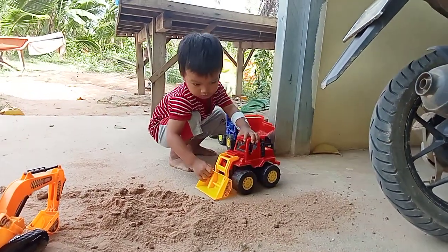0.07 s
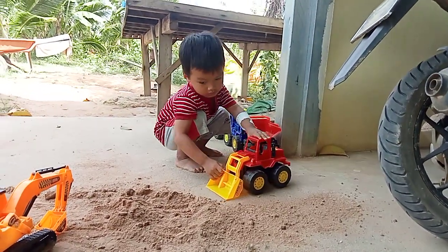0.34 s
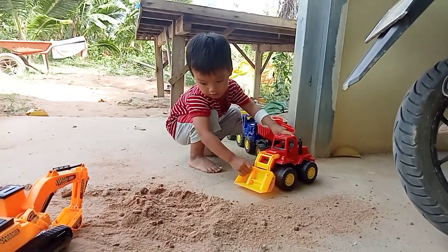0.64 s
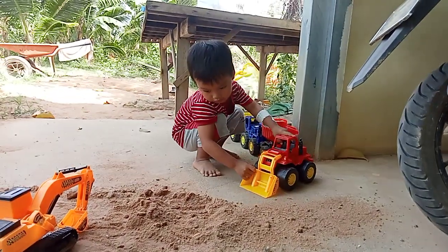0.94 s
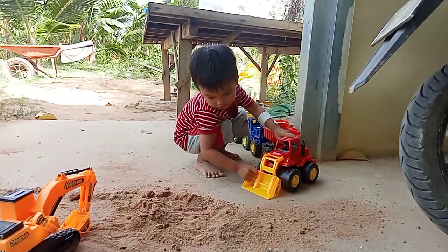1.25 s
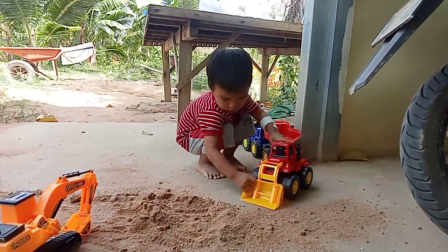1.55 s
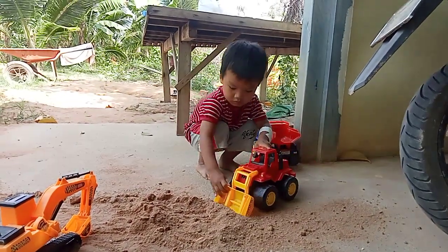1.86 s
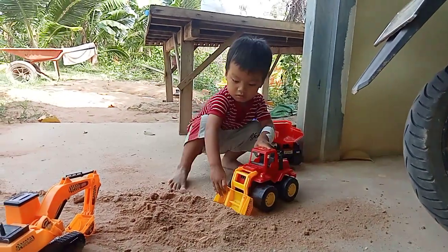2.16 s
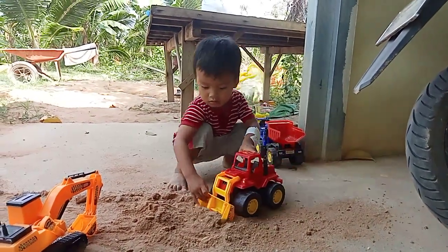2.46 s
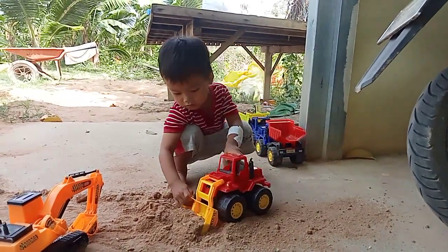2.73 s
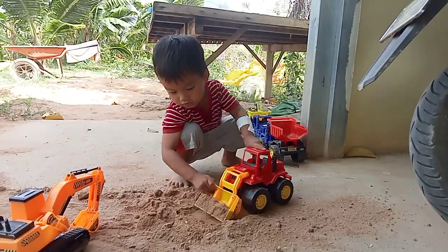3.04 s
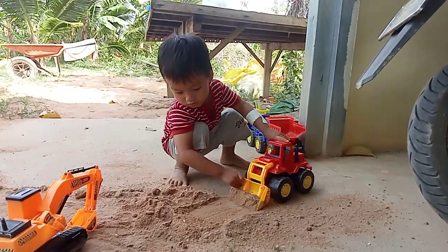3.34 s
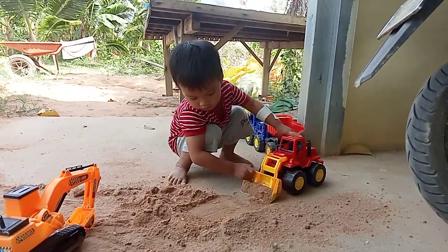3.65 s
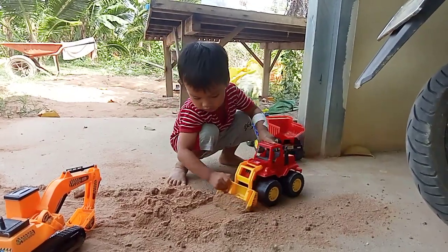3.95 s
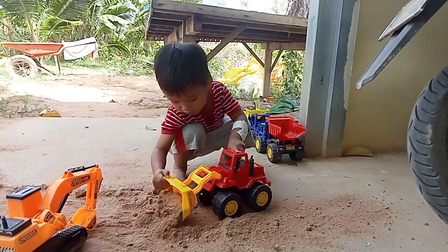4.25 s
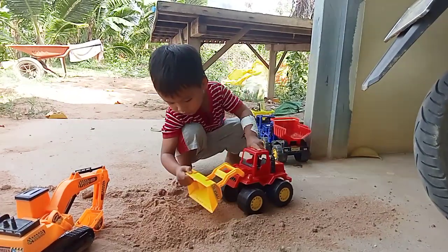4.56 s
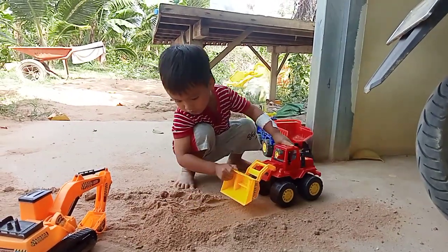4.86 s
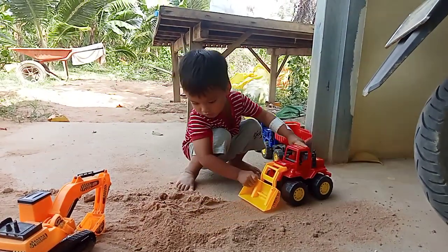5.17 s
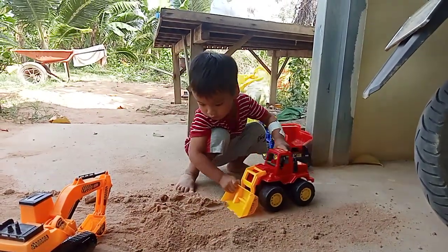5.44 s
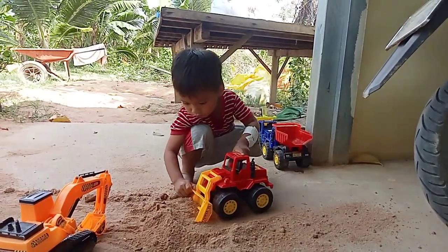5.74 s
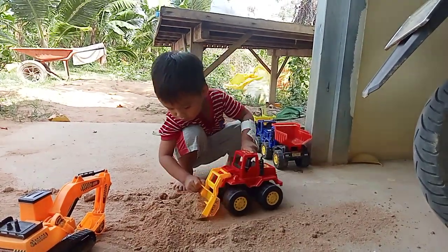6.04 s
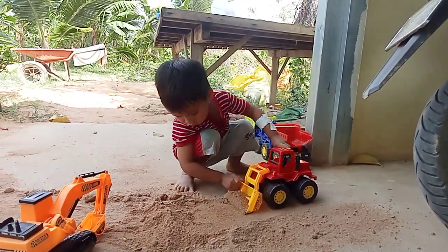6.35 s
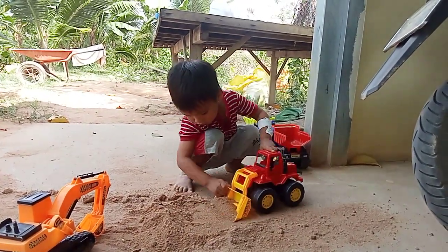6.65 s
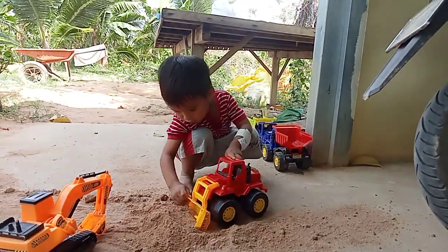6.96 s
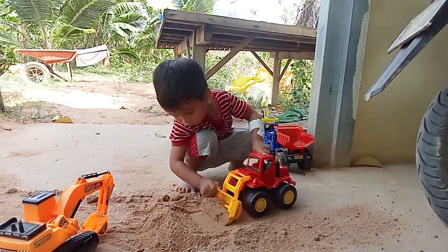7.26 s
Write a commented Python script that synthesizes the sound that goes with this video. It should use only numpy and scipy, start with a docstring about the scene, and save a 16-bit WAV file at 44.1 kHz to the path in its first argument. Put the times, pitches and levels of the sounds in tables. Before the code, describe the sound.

Close by, a hollow plastic toy loader is shoved back and forth through sand on a concrete porch floor. It starts with light gritty scrapes, then pushes harder in uneven bursts, its body rattling, grains crunching and loose joints clacking. The bucket rings briefly midway. A short echo follows the toy, while a faint outdoor hush, low rumble and insect-like shrill continue behind it.

```python
"""A short gritty scrape comes first: close by, a hollow plastic toy loader is shoved through sand on a concrete
porch floor. As it goes to and fro, bucket and chassis stick, slip and ring, grains crunch under them and loose
joints knock. Wall and roof send a short echo back to the microphone. A low rumble comes from the hand holding
the phone; beyond the porch lie an outdoor hush, an insect-like shrill and two far calls."""
import sys
import numpy as np
from scipy import signal
from scipy.fft import rfft, irfft
from scipy.io import wavfile
from scipy.ndimage import uniform_filter1d

SR = 44100
rng = np.random.default_rng(int(sys.argv[2]) if len(sys.argv) > 2 else 0)


def generate_wav(sig):
    """Save sig (samples, or channels by samples) to the path in sys.argv[1] as 16-bit PCM at SR."""
    pcm = np.round(np.clip(np.atleast_2d(sig).T, -1, 1) * 32767).astype(np.int16)
    wavfile.write(sys.argv[1], SR, pcm)


N = 326340
TIME = np.arange(N) / SR

# Low rumble from the hand holding the phone. Each row: centre in Hz, width in Hz, level in dB.
RUMBLE_BANDS = [(64.8, 14, -56.5), (87, 13, -55.5), (113.5, 15, -55), (133.6, 43, -59.5)]
# The insect-like shrill. One row: centre in Hz, width in Hz, level in dB.
SHRILL_BAND = (7900, 890, -64)
# Calls from far off. Each row: midpoint in seconds, pitch in Hz, level in dB.
FAR_CALLS = [(0.35, 1975, -53), (1.34, 1800, -56)]
# Tone colours of the distant hush and, close by, of sand, bucket, the loaded bucket's thrum and chassis, # as
# the phone's microphone hears them: its lift near 7.4 kHz and 15.5 kHz sits in the hush and sand. # Each row:
# frequency in Hz, relative level in dB.
HUSH_COLOUR = [(30, -4.5), (150, 11), (300, 0), (600, -2.5), (1200, -1), (1850, -5), (3600, -7),
               (5000, -24.5), (7600, -10), (10000, -23), (15500, -38)]
SAND_COLOUR = [(150, -52), (2000, -9.5), (4000, -13), (5300, -24), (6400, -13.5), (7300, 0.5), (8500, -6.5),
               (10200, -21.5), (12200, -16), (13600, -17.5), (15400, -11)]
BUCKET_COLOUR = [(40, -59), (270, -15), (420, -10.5), (600, 0.5), (880, 0), (1050, -2.5), (1240, 3.5),
                 (1500, -6), (2400, -39)]
THRUM_COLOUR = [(60, -32), (150, -7), (260, -13.5), (450, 0), (800, -30)]
CHASSIS_COLOUR = [(100, -41), (700, -20), (1300, -1), (1650, 2), (1950, 1.5), (2250, -1.5), (2750, -7.5),
                  (3500, -11.5), (4200, -20), (5500, -22.5), (9000, -48)]
# Modes of the plastic shell. Each row: frequency in Hz, relative level in dB, 60 dB decay in seconds.
SHELL_MODES = [(540, -8.5, 0.083), (652, -11, 0.072), (884, -9, 0.18), (1200, 0, 0.025), (1695, -10, 0.078),
               (1810, -28, 0.26), (1970, 9.5, 0.04), (2402, 8, 0.089), (2360, -22, 0.021),
               (3307, 12, 0.051), (3588, 15.5, 0.041), (3670, 5.5, 0.023)]
# Coarse grains cracking under the toy. Each row: start in seconds, relative level in dB.
GRAIN_CRACKS = [(0.6904, -32.5), (1.44, -27), (1.947, -15), (2.057, -27.5), (2.4659, -16), (2.805, -30),
                (2.985, -19.5), (3.0136, -21.5), (3.114, -21), (3.288, -19), (3.488, -25), (4.01, -21),
                (4.2122, -17), (4.493, -22), (5.3497, -26.5), (5.598, -12.5), (6.0275, -30), (6.202, -19),
                (6.229, -19), (6.4544, -25), (7.1152, -21), (7.297, -23), (7.3185, -14.5)]
# Knocks of the loose parts. Each row: start in seconds, level in dB, the bucket's share against the
# chassis from 0 to 1, grit in dB relative to the knock.
JOINT_KNOCKS = [(0.475, -42.5, 0.99, -14), (0.729, -24, 0.82, -24), (0.751, -26.5, 0.33, -0.5),
                (0.901, -22, 0.27, -12.5), (1.018, -28.5, 0.58, -24), (1.105, -34.5, 0.78, -4.5),
                (1.485, -27, 0.3, -6), (1.583, -18, 0.03, -2.5), (1.675, -22, 0.26, -6.5),
                (1.781, -18.5, 0.36, 0.5), (1.894, -23, 0.26, -1), (2.008, -26, 0.7, -26),
                (2.265, -26.5, 0.58, -4), (2.331, -16, 0.05, -14), (2.425, -19, 0.05, -9),
                (2.442, -14.5, 0, -11), (2.651, -24, .99, -23), (2.697, -17, 0.12, -8.5),
                (2.722, -24.5, .97, -7), (3.238, -29.5, 0.4, -1), (3.409, -27, 0.22, -0.5),
                (3.537, -25.5, .25, -7), (3.671, -20, 0.12, -8.5), (3.981, -19, 0, -3.5),
                (4.306, -31.5, 0.9, 3.5), (4.705, -20, 0.77, -28.5), (4.903, -26.5, 1, -28),
                (4.941, -22.5, 0.93, -5.5), (5.276, -27, 0.53, -32), (5.357, -32.5, 0.2, -12),
                (5.522, -20.5, 0.54, -3), (5.555, -14, 0.16, -5.5), (5.931, -24.5, 0.22, -15),
                (6.102, -20, .85, -4.5), (6.291, -18.5, 0.12, -21), (6.38, -23, 0.2, -3.5),
                (6.419, -23, 0, -15), (6.68, -19.5, 0.01, -9), (7.076, -30.5, 0, 0),
                (7.122, -18, 0.43, -3.5)]
# Shoves of the hand. Each row: start, time pressing harder and time easing off in seconds, chassis level
# at the hardest push in dB, swell in dB, then bucket and sand in dB relative to the chassis.
HAND_SHOVES = [(0.0, 0.0033, 0.099, -39, 12, -4, -2), (.28, 0.014, 0.11, -48, 9.5, -11, -6.5),
               (.634, .14, 0.3, -42, 5, 4, -6), (1.051, 0.094, .015, -56.5, 12, 8.5, 2),
               (1.408, 0.063, 0.23, -35.5, 1.5, -1, -2.5), (1.695, .13, .19, -24.5, 11, -4, -2),
               (2.21, .25, 0.28, -28, 12, -3, -2), (2.62, 0.095, 0.078, -30.5, 17.5, -0.5, -8),
               (2.885, 0.022, 0.023, -42, 9, -2, -1), (2.98, .135, .025, -42.5, 7.5, 1.5, 8.5),
               (3.1, 0.12, 0.14, -39, 8, 5, 2.5), (3.402, 0.039, 0.22, -37, 5, -4, -2),
               (3.767, .15, .095, -28, 13, -6.5, -3.5), (3.974, 0.067, 0.075, -28, 1.5, -0.5, 0),
               (4.147, 0.078, 0.16, -40.5, 8, 7, 7), (4.468, .13, .14, -53, -2, 6, 12.5),
               (4.7, 0.1, .16, -46.5, 1, 11.5, 3), (5.139, 0.079, 0.04, -48.5, -1, -5, 0),
               (5.35, 0.065, .03, -48, -2, 0, 3), (5.465, 0.15, 0.19, -22, 11, -5, -4),
               (5.704, 0.14, 0.016, -26, 3, -4.5, -3), (6.071, .17, 0.19, -31.5, 7.5, 2.5, -0.5),
               (6.609, .11, 0.063, -23, 13, -5.5, -2), (6.745, 0.09, 0.28, -24.5, 7.5, -3, -2),
               (7.115, 0.043, 0.017, -38, 5, 2.5, -2.5), (7.21, .16, 0.065, -34, 11, 4.5, 1)]
# Sand weighing the bucket down. Each row: time in seconds, thrum in dB relative to the bucket's scrape.
SAND_LOAD = [(0.8, -13), (1.8, -21), (2.5, -11), (3.2, -6), (4.1, -14.5), (4.8, -25), (5.7, -16.5),
             (6.8, -10.5)]
# Spells when one shell mode sings out. Each row: start and end in seconds, pitch in Hz, level in dB
# relative to the scrape.
SINGING_SPELLS = [(2.296, 2.583, 2020, 1.5), (4.12, 4.706, 1192, 0), (4.714, 4.958, 855, -8.5),
                  (7.138, 7.385, 1188, -13)]

CALL_RISE_HZ_PER_S, CALL_HALF_S, CALL_OCTAVE_DB = 1200, .08, -12
ATTACK_S, RELEASE_DB_PER_S = 0.022, 167  # the toy breaks loose at once and comes to rest quickly
BUCKET_FOLLOW = 0.9  # dB of bucket scrape for each dB of chassis rattle
RESTING_DB = -68  # the hand never holds the toy quite still
CATCH_S, CATCH_DB = 0.036, -3.5  # the toy sticks for a moment before it breaks loose with a knock


def undb(db):
    """Decibels to gain."""
    return 10 ** (np.asarray(db) / 20)


def unit(x):
    """Scale a response to an energy of one."""
    return x / np.sqrt(np.sum(x ** 2))


def through(x, response):
    """Pass a sound through an impulse response."""
    return signal.oaconvolve(x, response)[:len(x)]


def add(out, start_s, sound):
    """Mix a sound in at its start time."""
    start = max(int(start_s * SR), 0)
    out[start:start + len(sound)] += sound[:N - start]


def fade(t, t60):
    """Exponential decay by 60 dB in t60 seconds."""
    return np.exp(-np.log(1000) * t / t60)


def colour(points, size=2048):
    """Causal impulse response with a spectrum of (Hz, dB) points."""
    hz, db = np.transpose(points)
    grid_hz = np.maximum(np.fft.rfftfreq(size, 1 / SR), 1)
    gain = undb(np.interp(np.log(grid_hz), np.log(hz), db))
    cepstrum = irfft(np.log(gain))
    cepstrum[1:size // 2] *= 2  # fold to minimum phase
    cepstrum[size // 2 + 1:] = 0
    return unit(irfft(np.exp(rfft(cepstrum))))


def wash(t60, size=16384):
    """Countless overlapping resonances: a decaying noise with an even spectrum."""
    decay = fade(np.arange(size) / SR, t60)
    y = rng.standard_normal(size) * decay
    for _ in range(2):
        flattened = irfft(np.exp(1j * np.angle(rfft(y))))
        y = flattened * decay ** .25
    return unit(y)


def walk(rate_hz):
    """A random wander with a spread of one."""
    hold = max(int(SR / rate_hz), 1)
    steps = np.repeat(rng.standard_normal(N // hold + 1), hold)
    y = uniform_filter1d(steps, hold)[:N]
    return y / np.std(y)


def waver(hz, width_hz, drift, swell_db):
    """A narrow band of noise whose centre drifts and whose level swells; rms near one."""
    phase = 2 * np.pi * np.cumsum(hz * (1 + drift * walk(3.2))) / SR
    swell = undb(swell_db * walk(8.4))
    band = walk(width_hz) * np.sin(phase) + walk(width_hz) * np.cos(phase)
    return swell * band / np.sqrt(2)


def rumble():
    """Low bands of noise waver underneath everything."""
    return sum(undb(db) * waver(hz, width, drift=0.02, swell_db=3.5) for hz, width, db in RUMBLE_BANDS)


def hush(level_db):
    """The distant hush of the open air, gently rising and falling."""
    return through(rng.standard_normal(N), colour(HUSH_COLOUR)) * undb(level_db + walk(1.86))


def shrill():
    """A thin, steady, insect-like band from beyond the porch."""
    hz, width_hz, db = SHRILL_BAND
    return undb(db) * waver(hz, width_hz, drift=0.03, swell_db=1)


def far_calls():
    """Faint, hoarse calls far off, perhaps of a bird, each rising a little, with a weak octave."""
    middle_s, hz, db = np.transpose(FAR_CALLS)
    nearest = np.searchsorted((middle_s[1:] + middle_s[:-1]) / 2, TIME)
    t = np.clip(TIME - middle_s[nearest], -4 * CALL_HALF_S, 4 * CALL_HALF_S)
    pitch = hz[nearest] + CALL_RISE_HZ_PER_S * t
    low, octave = (waver(k * pitch, width_hz=k * 300, drift=.02, swell_db=2) for k in (1, 2))
    envelope = undb(db[nearest]) * np.exp(-(t / CALL_HALF_S) ** 2)
    return envelope * (low + undb(CALL_OCTAVE_DB) * octave)


def porch(x, floor_db, tail_db, t60):
    """The microphone gets the direct sound, the floor's bounce, then a tail between wall and roof."""
    response = undb(tail_db) * np.concatenate([np.zeros(int(.009 * SR)), wash(t60)])
    response[0] += 1
    response[int(.0023 * SR)] += undb(floor_db)
    return through(x, unit(response))


def sand_grain(t60, tilt_db):
    """Response of one size of grain: duller or brighter, with a ping at a pitch of its own."""
    db_per_octave = tilt_db * (2 * rng.random() - 1)
    t = TIME[:SR // 50]
    ping = unit(np.sin(2 * np.pi * rng.uniform(3500, 9000) * t) * fade(t, t60=.004))
    body = wash(t60, size=len(t)) + .5 * ping
    tilted = [(hz, db + db_per_octave * np.log2(hz)) for hz, db in SAND_COLOUR]
    return unit(through(body, colour(tilted)))


def plastic_part(points, ring_db, wash_db, wash_t60):
    """Response of a part at one contact spot: a snap, a dense wash and its own mix of shell modes."""
    dense = wash(wash_t60, size=8192)
    t = TIME[:len(dense)]
    hz, db, t60 = np.transpose(SHELL_MODES)[:, :, None]
    # each spot favours other modes, and grip and sand load detune them a little
    db = db + 4 * rng.standard_normal(db.shape)
    hz = hz * (1 + .012 * rng.standard_normal(hz.shape))
    ring = unit(np.sum(undb(db) * np.cos(2 * np.pi * hz * t) * fade(t, t60), axis=0))
    snap = t == 0
    return unit(through(snap + undb(wash_db) * dense + undb(ring_db) * ring, colour(points)))


def blow(spots, t60, bounce_s=.0045, bounce_db=-6):
    """A short rough contact and one bounce ring a random spot; the loudest 4 ms have an rms of one."""
    spot = spots[rng.integers(len(spots))]
    t = TIME[:8192]
    since_bounce = t - bounce_s * rng.uniform(.6, 1.6)
    bounce = undb(bounce_db) * (since_bounce > 0) * fade(np.abs(since_bounce), t60)
    force = (fade(t, t60) + bounce) * rng.standard_normal(len(t))
    y = through(force, spot)
    return y / np.sqrt(uniform_filter1d(y ** 2, SR // 250).max())


def slips(spots, level_db, per_s, spread_db, t60):
    """Random slips of uneven size, each a tiny burst of micro-contacts that rings one contact spot."""
    happens = rng.random(N) < per_s / SR
    size_db = spread_db * np.minimum(rng.exponential(size=N), 3)
    energy = happens * undb(size_db) ** 2
    where = rng.integers(len(spots), size=N)
    pole = fade(1 / SR, 2 * t60) ** 2  # decay of power per sample, slowed twofold
    pole = pole ** 2  # back to a fall of 60 dB in t60
    powers = [signal.lfilter([1], [1, -pole], energy * (where == k) + 1e-9) for k in range(len(spots))]
    # the hand supplies steady work, so a big slip leaves less for its neighbours
    total = sum(powers)
    supply = uniform_filter1d(total, SR // 28) + 0.26 * np.mean(total)
    force = rng.standard_normal(N) * undb(level_db) / np.sqrt(supply)
    return sum(through(force * np.sqrt(power), spot) for power, spot in zip(powers, spots))


def cracking(sand):
    """Single coarse grains burst with a bright tick."""
    out = np.zeros(N)
    for start, db in GRAIN_CRACKS:
        add(out, start, undb(db - 7.5) * blow(sand, t60=0.044, bounce_s=0.0026, bounce_db=-5))
    return out


def knocking(bucket, chassis, sand):
    """Each knock rings bucket and chassis and grinds the grit at the point of contact."""
    out = np.zeros(N)
    for start, db, share, grit_db in JOINT_KNOCKS:
        hollow = np.sqrt(share) * blow(bucket, t60=.024)
        clack = np.sqrt(1 - share) * blow(chassis, t60=.018)
        grit = undb(grit_db) * blow(sand, t60=.026)
        add(out, start, undb(db) * (hollow + clack + grit))
    return out


def singing(scrape_db):
    """With the bucket held at certain angles, the slips feed a single mode of the shell."""
    out, t = np.zeros(N), TIME[:SR // 8]
    for start, end, hz, db in SINGING_SPELLS:
        mode = unit(np.sin(2 * np.pi * hz * t) * fade(t, t60=.035))
        held = uniform_filter1d(1. * ((TIME > start) & (TIME < end)), SR // 25)
        out += held * slips([mode], scrape_db + db, per_s=160, spread_db=-5, t60=.0112)
    return out


def pushing():
    """Levels in dB of bucket, chassis and sand: each shove breaks loose, swells, eases and stops."""
    clock = TIME[::SR // 1000]
    power = undb(RESTING_DB) ** 2
    for start, press, ease, db, swell_db, bucket_db, sand_db in HAND_SHOVES:
        t = clock - start
        force_db = np.interp(t, [0, press, press + ease], [-swell_db, 0, -swell_db])
        release_db = RELEASE_DB_PER_S * np.maximum(t - press - ease, 0)
        moving = np.clip(t / ATTACK_S, 0, 1) * undb(db - release_db)
        parts_db = [bucket_db + BUCKET_FOLLOW * force_db, force_db, sand_db + force_db]
        power = power + (moving * undb(parts_db)) ** 2
    caught_db = sum(np.interp(clock - knock_s, [-CATCH_S, 0, CATCH_S / 10], [0, CATCH_DB, 0])
                    for knock_s, *_ in JOINT_KNOCKS)
    return [np.interp(TIME, clock, 10 * np.log10(part) + caught_db) for part in power]


def scraping(bucket, chassis, sand):
    """Stick-slip shakes bucket and chassis and crushes sand; a harder push makes the slips denser."""
    bucket_db, chassis_db, sand_db = pushing()
    thrum_db = bucket_db + np.interp(TIME, *np.transpose(SAND_LOAD))
    effort = undb(.5 * (chassis_db - chassis_db.max()))
    judder_db = 1.36 * walk(130)  # the whole toy catches and lets go
    scrape = slips(bucket, bucket_db + judder_db, per_s=120 + 400 * effort, spread_db=2.5, t60=.03)
    thrum = slips([colour(THRUM_COLOUR)], thrum_db + judder_db, per_s=140, spread_db=8, t60=.03)
    rattle = slips(chassis, chassis_db + judder_db, per_s=80 + 500 * effort, spread_db=-0.5, t60=.03)
    crunch = slips(sand, sand_db + judder_db, per_s=80 + 560 * effort, spread_db=3, t60=.016)
    return scrape + thrum + rattle + crunch + singing(np.maximum(bucket_db, chassis_db))


def scene():
    """One microphone on the porch: the toy close by, the open air behind it."""
    spots = range(9)
    bucket = [plastic_part(BUCKET_COLOUR, ring_db=-13, wash_db=0, wash_t60=0.043) for _ in spots]
    chassis = [plastic_part(CHASSIS_COLOUR, ring_db=-7.5, wash_db=5, wash_t60=0.045) for _ in spots]
    sand = [sand_grain(t60=0.01, tilt_db=1.5) for _ in spots]
    toy = scraping(bucket, chassis, sand) + knocking(bucket, chassis, sand) + cracking(sand)
    outdoors = rumble() + hush(level_db=-55) + shrill() + far_calls()
    return (porch(toy, floor_db=-17.5, tail_db=-9, t60=0.2) + outdoors)[None]


def record(dry):
    """The microphone is a phone's, and the phone cuts the top steeply."""
    top_hz = 15850
    return signal.sosfilt(signal.ellip(10, .2, 70, top_hz, fs=SR, output="sos"), dry, axis=-1)


dry = scene()
out = record(dry)
generate_wav(out)
```